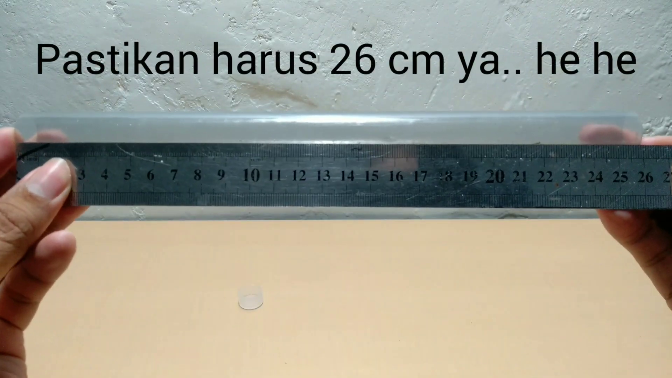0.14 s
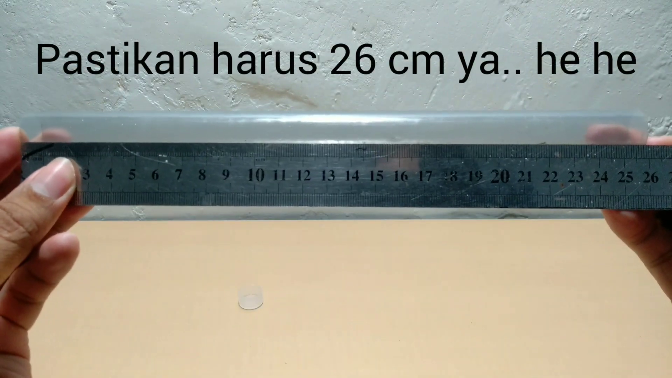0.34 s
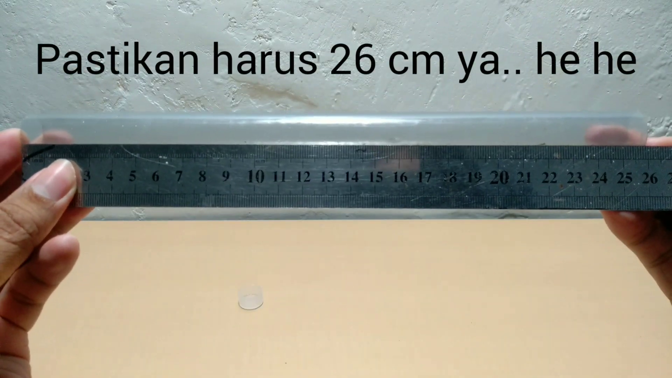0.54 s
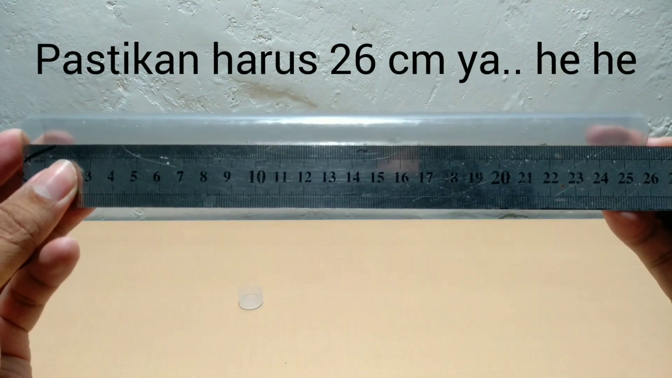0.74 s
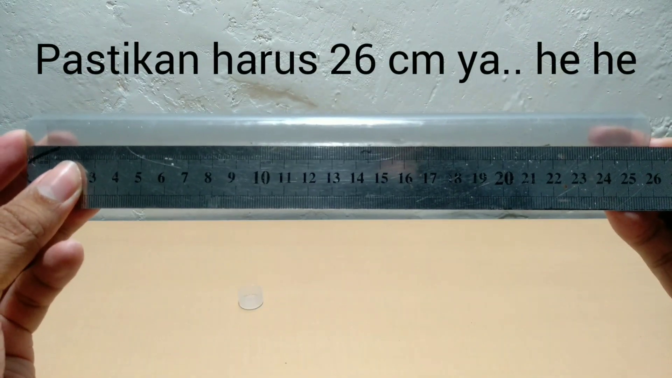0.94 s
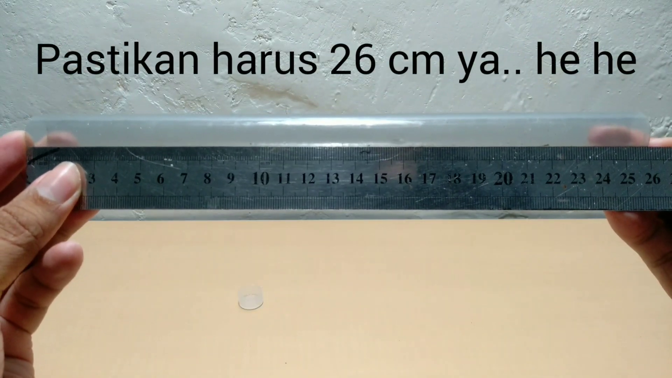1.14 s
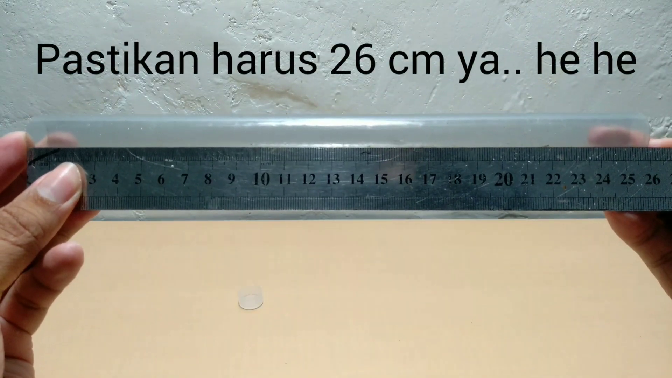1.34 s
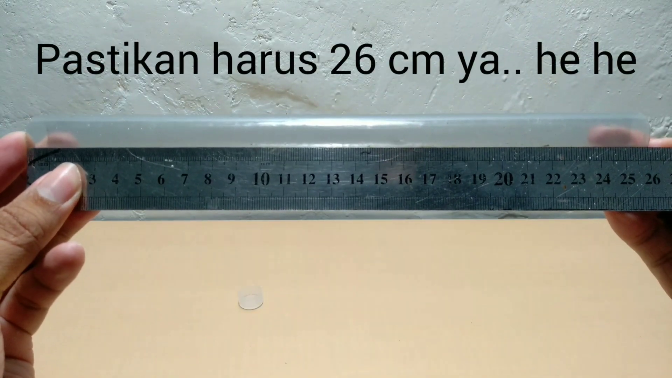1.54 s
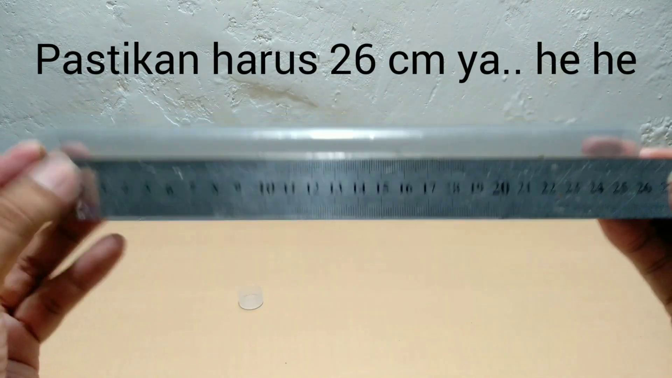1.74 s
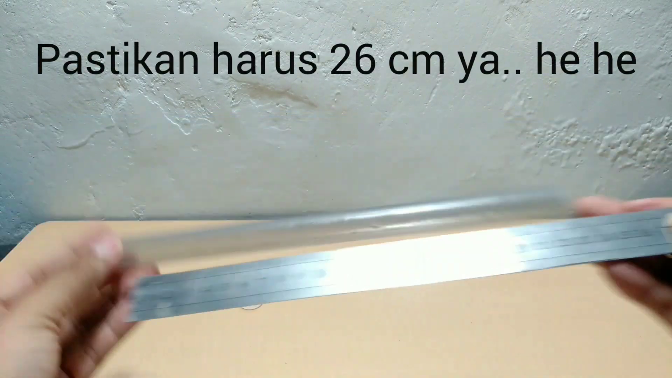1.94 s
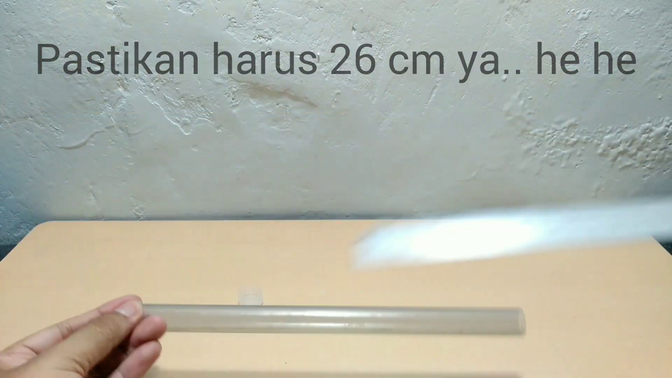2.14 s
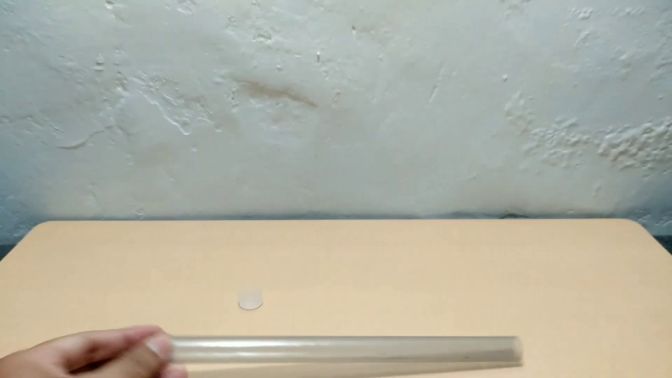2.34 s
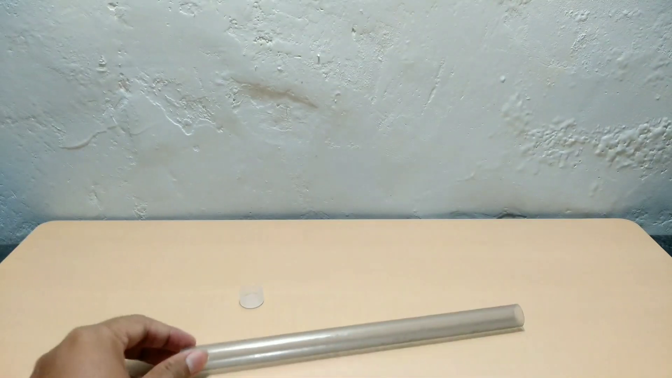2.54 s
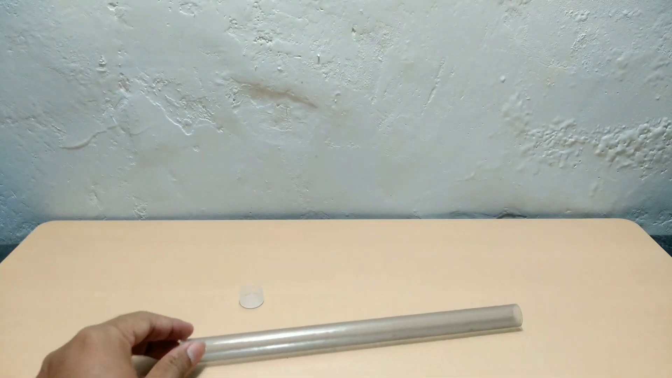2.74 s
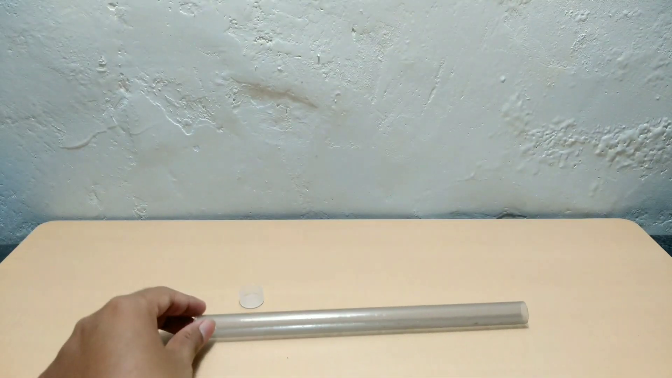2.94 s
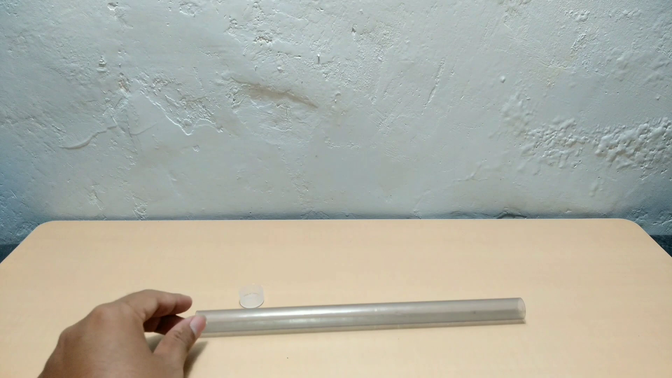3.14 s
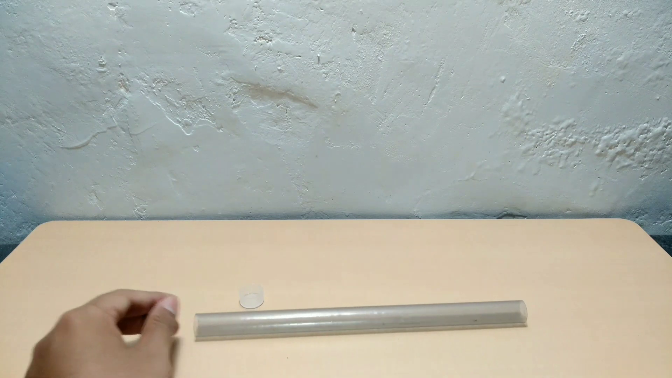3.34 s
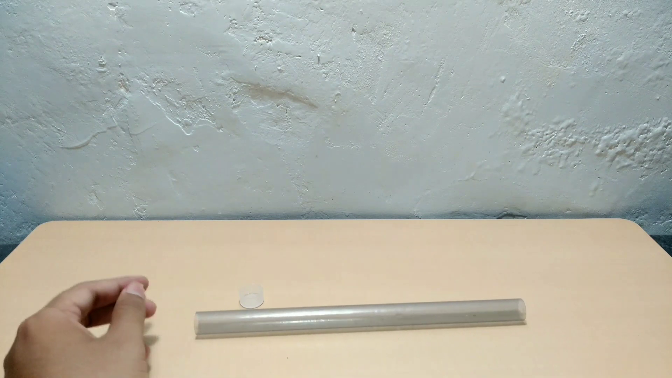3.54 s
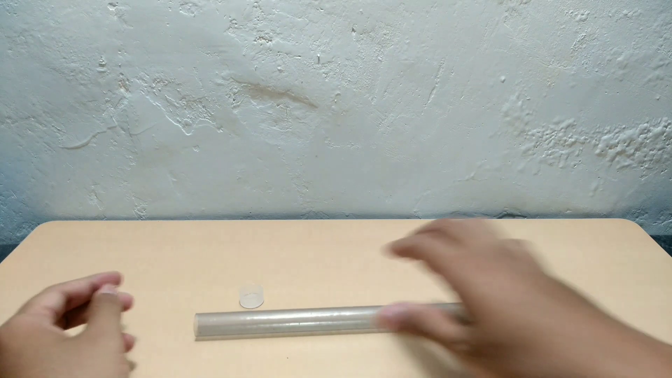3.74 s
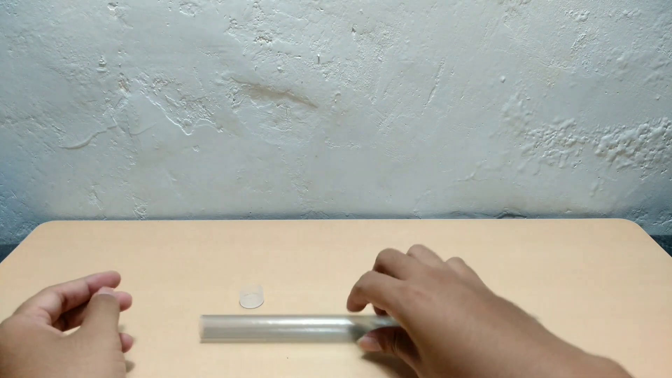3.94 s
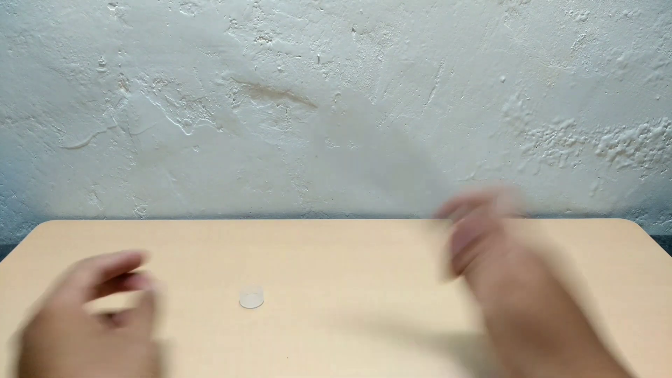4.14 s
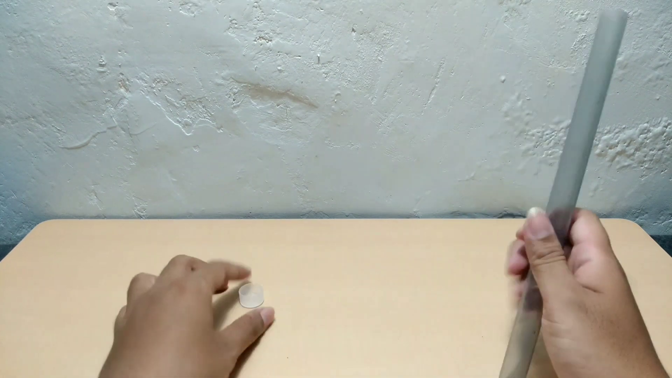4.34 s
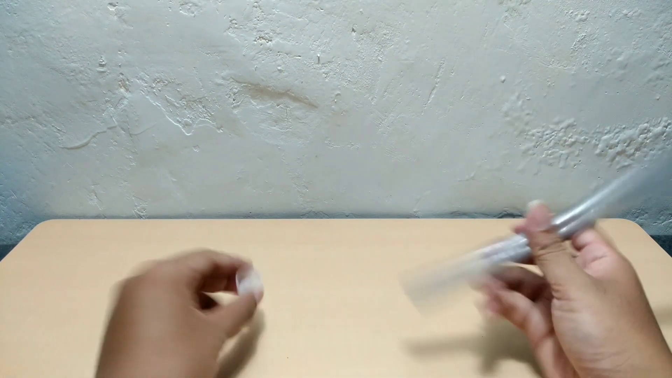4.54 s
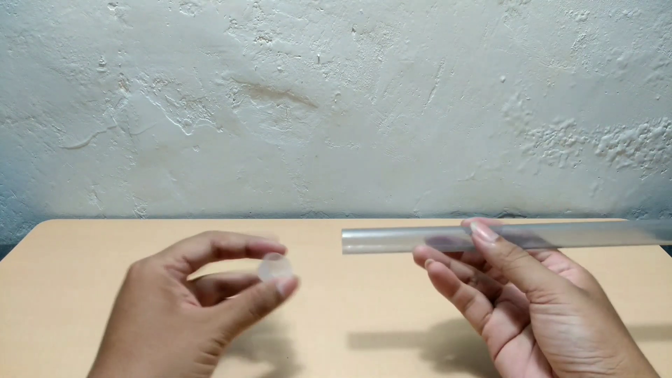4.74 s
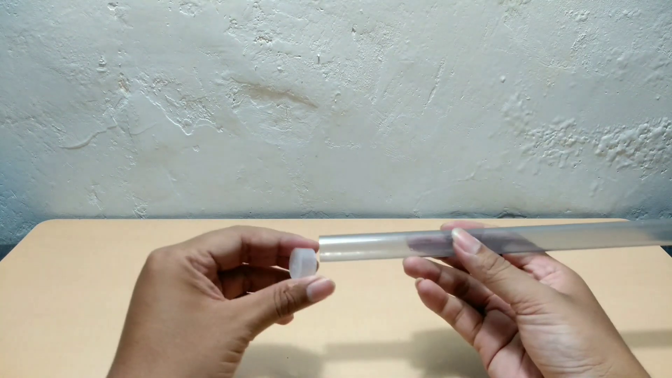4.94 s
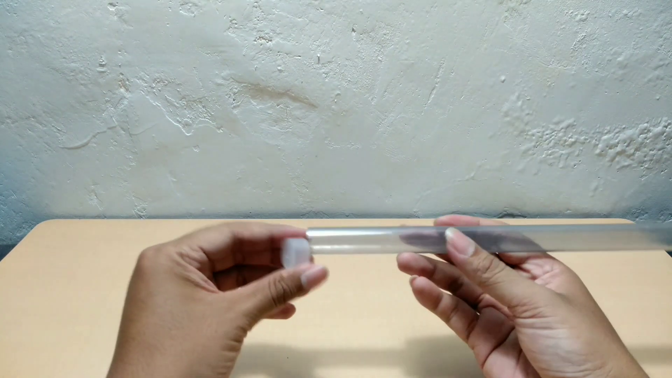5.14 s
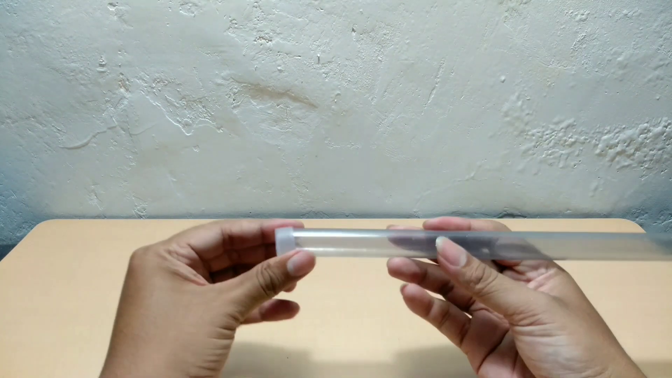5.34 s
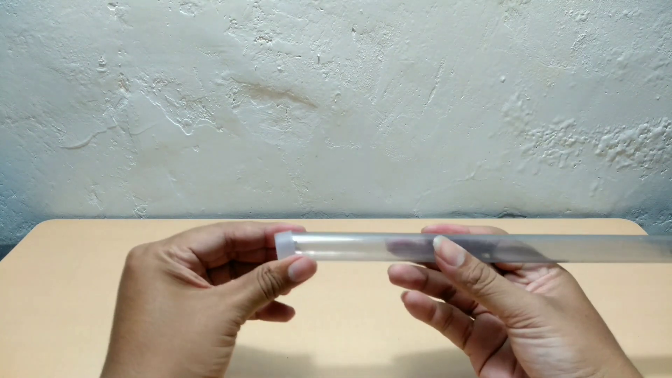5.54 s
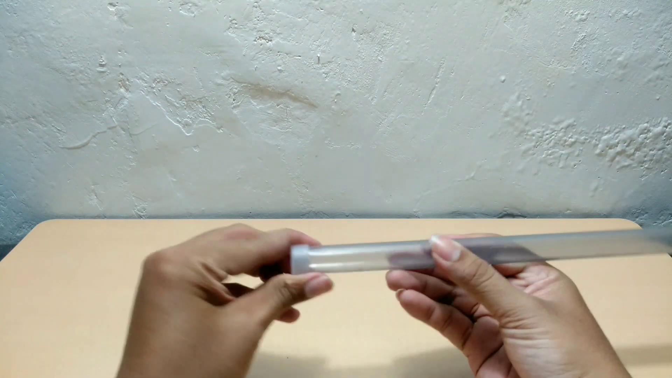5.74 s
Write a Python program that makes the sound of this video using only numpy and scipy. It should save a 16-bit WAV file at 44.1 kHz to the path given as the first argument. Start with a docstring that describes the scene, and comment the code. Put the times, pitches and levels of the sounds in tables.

```python
"""Tube and ruler over a small table

A clear plastic tube and a steel ruler are handled in a quiet room, close to a phone with two microphones.
Knocks ring modes of table and tube with a crackling contact; rubs are swelling noise with a faint squeak.
A cap slips into the tube and rings its air column; finger bumps are soft low noise; the ruler tings once.
A dull wall echo and a short noise tail place the handling in the room, over a slow rumble and faint hiss.
"""
import sys
import numpy as np
from scipy import signal
from scipy.fft import rfft, irfft, next_fast_len
from scipy.io import wavfile
from scipy.ndimage import uniform_filter1d

SR = 44100
rng = np.random.default_rng(int(sys.argv[2]) if len(sys.argv) > 2 else 0)


def log_audio(samples):
    """Write samples as a 16-bit WAV file to the path given in sys.argv[1]."""
    # one column per channel
    frames = np.atleast_2d(samples).T
    # limit to full scale, then quantise
    limited = np.clip(frames, -1, 1)
    pcm = np.round(limited * 32767).astype(np.int16)
    wavfile.write(sys.argv[1], SR, pcm)


N = 254765  # length in samples

# Knocks of tube, ruler and table top. Each row: start in seconds, level in dB, contact cut-off in Hz,
# favoured table mode in Hz, shell ring in dB, crack in dB before the shared crack trim.
KNOCK_EVENTS = [(1.9296, -19.5, 8650, 149, -1, 0), (1.9314, -25.5, 9000, 740, 3, 1),
                (2.0929, -24, 9350, 133, 3, 1), (2.1366, -29, 8900, 130, 4, 1.5),
                (2.163, -39.5, 5000, 129, -2, 2), (2.3477, -43, 2500, 1040, -10, -8),
                (2.356, -43.5, 4000, 139, -9, 2), (3.8344, -33, 6340, 124, -11, 5.5),
                (3.9276, -31.5, 3560, 1030, -5, 8), (4.063, -15.5, 1500, 1110, -1, -11),
                (4.0705, -25, 800, 520, -6, -12)]
# Clearest slides of fingers and ruler on plastic. Each row: peak time in seconds, level in dB,
# fall time constant in seconds, tilt in dB per octave.
RUB_EVENTS = [(.511, -42.5, .018, -1), (.768, -52.5, 0.011, -1.5), (.792, -50.5, 0.019, -3),
              (1.153, -55.5, .022, 3), (1.3, -53, 0.023, -1.5), (1.679, -50, 0.013, -1.5),
              (1.918, -35, .011, -1.5), (2.081, -38, .012, -.5), (2.195, -52, 0.082, -0.5),
              (2.348, -53.5, .03, 0.5), (2.97, -54, 0.038, -1.5), (3.157, -44.5, .017, .3),
              (3.57, -58, 0.024, 3), (3.78, -45.5, 0.034, 0), (3.85, -54.5, 0.032, -2.5),
              (3.915, -48.5, 0.0088, -2.5), (4.278, -40, 0.0085, 1.5), (4.305, -53, 0.034, 0),
              (4.388, -55, 0.025, 1.5), (4.48, -51.5, 0.031, -2.5), (4.712, -55, 0.025, 1),
              (5.037, -57.5, .03, 0), (5.365, -50.5, 0.044, 0.5), (5.425, -42, .012, -3),
              (5.57, -43.5, .011, 2)]
# Slips of the cap into the tube. Each row: start in seconds, level in dB, contact cut-off in Hz,
# scratch in dB, left minus right in dB.
CAP_SLIPS = [(5.4154, -31, 900, -6, 1), (5.4216, -33.5, 1490, -13, -6.5), (5.4261, -30.5, 5000, -11, 2),
             (5.5641, -29.5, 332, -13, 3), (5.571, -28.5, 510, -17, 0)]
# Soft bumps of the fingers. Each row: start in seconds, level in dB, colour centre in Hz.
FINGER_BUMPS = [(.486, -56, 800), (3.469, -52, 380), (4.228, -52.5, 279), (4.277, -40.5, 104),
                (4.323, -51, 670), (4.341, -46, 313), (4.382, -47.5, 325), (4.447, -41.5, 435),
                (4.477, -50, 795), (4.592, -48.5, 570), (4.719, -50.5, 357), (5.291, -49, 696)]

# Modes of the table top, before the favoured ones are lifted.
# Each row: frequency in Hz, level in dB, 60 dB decay in seconds.
TABLE_MODES = [(129.4, -10.5, 0.12), (171, -9, 0.057), (230, -11, 0.045), (300.5, -15, 0.099),
               (510, -11, 0.049), (543, -13, 0.052), (734, -10.5, 0.073), (802, -2, 0.025),
               (915, -7, 0.043), (1049, -15.5, 0.035), (1326, -10.5, 0.029), (1430, -18.5, 0.024),
               (1750, -6.5, 0.0073)]
# Modes of the shell of whatever strikes the table. Each row: frequency in Hz, level in dB, 60 dB decay in seconds.
SHELL_MODES = [(2540, -14, 0.05), (2760, -10, 0.022), (2970, -12, 0.029), (3280, -6.5, 0.032),
               (3775, -0.5, 0.027), (3940, -4, 0.023), (4330, -9.5, 0.021), (4850, -22, 0.038),
               (5270, -19, 0.018), (5550, -20, 0.027), (8170, -12, 0.0204), (8600, -23, .025),
               (10570, -11.5, .03)]
# Modes of the capped tube, air and wall. Each row: frequency in Hz, level in dB, 60 dB decay in seconds.
CAPPED_TUBE_MODES = [(294, -7.5, 0.03), (338, -5, 0.11), (385, -12, 0.07), (487, -7.5, 0.03),
                     (760, -15.5, 0.067), (973, -9.5, 0.1), (1635, -3.5, 0.053), (2254, -6, 0.045),
                     (2380, 0, 0.022), (2800, -15, .035)]
# Modes of the steel ruler. Each row: frequency in Hz, level in dB, 60 dB decay in seconds.
RULER_MODES = [(2260, -58, 0.28), (3628, -38, 0.085), (3660, -57, 0.16), (6000, -52, 0.065),
               (8300, -57.5, 0.5)]

# Noise colours; only their shape counts, as the noise is brought to rms 1.
# Crackling contact of a knock. Each row: frequency in Hz, relative density in dB per Hz.
CRACK_COLOUR = [(200, -15), (350, -1.5), (800, 3.5), (2000, -10.5), (3800, 3.5), (6500, -2), (9500, 7),
                (11500, 4), (13500, 1), (15500, 3.5)]
# Sliding on plastic. Each row: frequency in Hz, relative density in dB per Hz.
SLIDE_COLOUR = [(150, -53), (500, -2.5), (900, -5.5), (1700, 1.5), (3500, 3), (6500, 1), (9000, 0.5),
                (13000, -8), (15500, -9)]
# Fingers bumping tube and table. Each row: frequency in Hz, relative density in dB per Hz.
FINGER_COLOUR = [(80, 7), (200, -7.5), (310, 8), (410, 2.5), (520, -11.5), (620, 0.5), (750, 3), (900, -9),
                 (1150, -9), (2000, -9)]
# Diffuse tail of the room. Each row: frequency in Hz, relative density in dB per Hz.
TAIL_COLOUR = [(50, -7), (130, -5), (300, 0), (800, -4.5), (2000, 8), (5000, 3.5), (10000, 5.5),
               (16000, 4.5)]
# Background air. Each row: frequency in Hz, relative density in dB per Hz.
AIR_COLOUR = [(20, -28), (35, -12), (55, -2), (85, -1), (135, 1), (172, -3), (210, -12), (380, -14.5),
              (620, -23), (750, -20), (950, -23.5), (10000, -28), (13000, -33.5), (15800, -33.5)]
# Slow swell of the rumble, used relative to its median. Each row: time in seconds, level in dB.
RUMBLE_SWELL = [(0.0, -56.0), (0.47, -57.5), (0.59, -53), (1.06, -60.5), (1.18, -49.5), (1.42, -58),
                (2.36, -53), (2.48, -58.5), (3.54, -55.5), (3.77, -57.5), (4.25, -54.5), (4.95, -55.5),
                (5.19, -58.5), (5.43, -55), (5.78, -61)]
# Likeness of the two microphones. Each row: frequency in Hz, correlation from 0 to 1.
MIC_LIKENESS = [(30, .6), (70, .8), (130, .96), (300, .88), (600, .85), (1100, .62), (2200, .05),
                (15000, 0)]


def knocks(crack_t60=0.082, crack_db=-3, chatter_db=3.5, chatter_s=0.00129, bite_s=0.0005,
           build_s=0.00041, push_s=0.00012, ripple_db=3, edge_db=-11,
           favour_db=8, favour_octaves=0.28, pan_db=-1):
    """Each blow rings the table top and the thing that strikes it, and chatters at the contact."""
    out, t = np.zeros((2, N)), event_time(size=6144)
    table_hz, table_db, table_t60 = np.transpose(TABLE_MODES)
    for s, db, cut_hz, favoured_hz, shell_db, tick_db in KNOCK_EVENTS:
        chatter = undb(tick_db + crack_db + chatter_db * wander(t / chatter_s)) * onset(t, bite_s)
        crack = noise(len(t), CRACK_COLOUR, ripple_db * ripple(len(t))) * fade(t, crack_t60) * chatter
        shell = ring(SHELL_MODES, t) * undb(shell_db) * onset(t, build_s)
        # the place of the blow decides which modes of the table answer most
        struck_db = table_db + favour_db * hump(table_hz, favoured_hz, favour_octaves)
        table = ring(zip(table_hz, struck_db, table_t60), t) * onset(t, push_s)
        blow = soften(table + shell + crack, cut_hz)
        # a hard edge lets a little treble through even on a soft blow
        edge = undb(edge_db) * crack
        add(out, s, -undb(db) * (blow + edge), pan_db)
    return out


def rubs(slides, rise_share=0.9, slip_db=-0.5, slip_s=0.0057,
         grain_db=1.5, grain_s=0.0012, catch_db=1.5, catch_s=0.00709, ripple_db=4.0,
         squeak_hz=8600, squeak_db=3, squeak_octaves=0.38,
         hollow_hz=775, hollow_db=10.5, hollow_octaves=0.16):
    """Slides swell and die away; skin catches and lets go, plastic adds grain, and the tube answers hollowly."""
    out, t = np.zeros((2, N)), event_time()
    lead = 0.15  # seconds of swell kept ahead of the peak
    hz = bins(len(t))
    squeak = squeak_db * hump(hz, squeak_hz, squeak_octaves)
    hollow = hollow_db * hump(hz, hollow_hz, hollow_octaves)
    for s, db, fall, tilt_db in slides:
        # the rise takes rise_share of the fall time
        swell = np.exp(np.minimum((t - lead) / rise_share, lead - t) / fall)
        # at the peak the skin lets go with a short extra burst
        slip = undb(slip_db) * (t > lead) * np.exp(-np.abs(t - lead) / slip_s)
        rough_db = grain_db * wander(t / grain_s) + catch_db * wander(t / catch_s)
        colour_db = tilt_db * np.log2(hz + 1) + squeak + hollow + ripple_db * ripple(len(t))
        hiss = noise(len(t), SLIDE_COLOUR, colour_db)
        add(out, s - lead, undb(db + rough_db) * (swell + slip) * hiss)
    return out


def grip_shifts(per_s=3.4, level_db=-60.5, spread_db=2, fall_s=0.025, tilt_db=0):
    """Faint slides as the grip shifts, one at a chance moment in each equal slot, as rows like RUB_EVENTS."""
    starts = np.arange(0, N / SR - 1 / per_s, 1 / per_s)
    chance = rng.uniform(0, 1, (len(starts), 2))
    return [(s + late / per_s, level_db + spread_db * (2 * strong - 1), fall_s, tilt_db)
            for s, (late, strong) in zip(starts, chance)]


def cap(scratch_t60=0.018):
    """Each slip scratches and rings the stopped air column (near odd multiples of 330 Hz) and the tube wall."""
    out, t = np.zeros((2, N)), event_time(size=6144)
    for s, db, cut_hz, scratch_db, pan_db in CAP_SLIPS:
        scratch = undb(scratch_db) * noise(len(t), SLIDE_COLOUR) * fade(t, scratch_t60)
        pop = soften(ring(CAPPED_TUBE_MODES, t), cut_hz)
        add(out, s, undb(db) * (pop + scratch), pan_db)
    return out


def bumps(rise_s=0.0017, fall_s=0.033, skirt_db=7):
    """Flesh lands slowly and shudders, stirring mostly the low resonances of tube and table."""
    out, t = np.zeros((2, N)), event_time(size=8192)
    shape = onset(t, rise_s) * np.exp(-t / fall_s)
    shape = shape / shape.max()
    for s, db, centre_hz in FINGER_BUMPS:
        octaves = np.log2((bins(len(t)) + 1) / centre_hz)
        thud = noise(len(t), FINGER_COLOUR, -skirt_db * octaves ** 2)
        add(out, s, undb(db) * shape * thud)
    return out


def ruler(s=3.016, pan_db=5, touch_s=0.0021):
    """The steel ruler is touched lightly, so its modes build gently, and it tings."""
    out, t = np.zeros((2, N)), event_time()
    add(out, s, ring(RULER_MODES, t) * onset(t, touch_s), pan_db)
    return out


def room(x, wet_db=-10.0, low_t60=0.19, high_t60=0.14, split_hz=1760, first_s=0.0047,
         wall_s=0.00378, wall_db=-7, wall_hz=2500):
    """The wall behind the table throws back one dull echo; the small room adds a short diffuse tail."""
    t = event_time()
    tail = noise(len(t), TAIL_COLOUR)
    low = soften(tail, split_hz)
    tail = low * fade(t, low_t60) + (tail - low) * fade(t, high_t60)
    tail *= np.clip(t / first_s - 1, 0, 1)  # silent until first_s, full at twice that
    tail *= undb(wet_db) / np.sqrt(np.sum(tail ** 2) / 2)
    out = x + signal.fftconvolve(x, tail, axes=1)[:, :N]
    add(out, wall_s, undb(wall_db) * soften(x, wall_hz))
    return out


def background(air_db=-55, split_hz=260, rumble_db=-1, throb_db=3.5, throb_hz=16,
               hiss_db=-3, waver_db=1, waver_hz=9, flicker_db=4.5):
    """A low rumble that swells slowly and throbs unevenly under a faint, flickering hiss."""
    t = np.arange(N) / SR
    # level of the whole air, before rumble and hiss are trimmed apart
    air = noise(next_fast_len(N), AIR_COLOUR)[:, :N] * undb(air_db)
    low = signal.sosfiltfilt(signal.butter(2, split_hz, fs=SR, output="sos"), air)
    s, db = np.transpose(RUMBLE_SWELL)
    swell_db = np.interp(t, s, db - np.median(db)) + throb_db * wander(t * throb_hz)
    rumble = low * undb(rumble_db + swell_db)
    hiss = flicker(air - low, flicker_db) * undb(hiss_db + waver_db * wander(t * waver_hz))
    return rumble + hiss


def undb(db):
    """Decibels to gain."""
    return 10 ** (np.asarray(db) / 20)


def on_log(points, hz):
    """Read (Hz, value) points on a log-frequency axis."""
    f, v = np.transpose(points)
    return np.interp(np.log(hz + 1), np.log(f), v)


def bins(size):
    """Frequencies in Hz of a spectrum of this many samples."""
    return np.fft.rfftfreq(size, 1 / SR)


def event_time(size=16384):
    """Time axis in seconds of one short event."""
    return np.arange(size) / SR


def noise(size, colour, extra_db=0):
    """Coloured stereo noise of rms 1; alike in most of the bass, unrelated in the high treble."""
    hz = bins(size)
    alike = np.clip(on_log(MIC_LIKENESS, hz), -.99, .99)
    mid, side = rfft(rng.standard_normal((2, size)))
    both = mid * np.sqrt(1 + alike) + side * np.sqrt(1 - alike) * np.array([[1], [-1]])
    x = irfft(both * undb(on_log(colour, hz) + extra_db), size)
    return x / x.std()


def fade(t, t60):
    """A decay of 60 dB in t60 seconds."""
    return np.exp(-np.log(1000) * t / t60)


def onset(t, rise_s):
    """A rise from 0 towards 1 with a time constant in seconds."""
    return 1 - np.exp(-t / rise_s)


def ring(modes, t):
    """Struck modes, slightly detuned by chance; the higher ones reach the two microphones out of step."""
    out = 0
    for k, (hz, db, t60) in enumerate(modes):
        # the phase between the microphones follows their likeness at this frequency
        apart = np.arccos(np.clip(on_log(MIC_LIKENESS, hz), -1, 1))
        skew = (-1) ** k * apart / 2 * np.array([[1], [-1]])
        detune = 1 + 0.0041 * rng.standard_normal()
        start = rng.uniform(0, 2 * np.pi) * min(hz / 3000, 1)
        tone = np.cos(2 * np.pi * hz * detune * t + skew + start)
        out = out + undb(db) * fade(t, t60) * tone
    return out


def soften(x, cut_hz):
    """A low-pass: a softer contact pushes for longer and leaves out the treble."""
    return signal.sosfilt(signal.butter(2, min(cut_hz, SR / 2.2), fs=SR, output="sos"), x)


def add(out, s, x, pan_db=0):
    """Mix a sound in at s seconds; pan_db is left minus right."""
    i = max(int(s * SR), 0)
    panned = x * undb(np.array([[pan_db], [-pan_db]]) / 2)
    out[:, i:i + x.shape[1]] += panned[:, :N - i]


def wander(points):
    """Random levels joined by straight lines, read at the given positions."""
    levels = rng.standard_normal(int(points.max()) + 2)
    return np.interp(points, np.arange(len(levels)), levels)


def ripple(size, spacing_hz=220):
    """Chance spectral peaks and dips, full above 2 kHz: every contact point favours its own resonances."""
    hz = bins(size)
    return wander(hz / spacing_hz) * np.clip(hz / 2000, 0, 1)


def hump(hz, centre_hz, octaves):
    """A bell of height 1 on a log-frequency axis."""
    return np.exp(-(np.log2((hz + 1) / centre_hz) / octaves) ** 2)


def flicker(x, depth_db, size=2048):
    """Let narrow bands waver, with neighbouring bands and frames smoothed together."""
    _, _, bands = signal.stft(x, nperseg=size)
    walk = rng.standard_normal(bands.shape[1:])
    walk = uniform_filter1d(walk, size=7, axis=0)
    walk = uniform_filter1d(walk, size=2, axis=1)
    gain = undb(depth_db * walk / walk.std())
    return signal.istft(bands * gain, nperseg=size)[1][:, :N]


def scene():
    """All handling sounds in the room, over its background."""
    slides = rubs(RUB_EVENTS + grip_shifts())
    handling = knocks() + slides + cap() + bumps() + ruler()
    return room(handling) + background()


def record(dry, bass_hz=55, top_hz=15800):
    """The phone thins the deep bass and cuts the top steeply."""
    thin = signal.sosfilt(signal.butter(2, bass_hz, "high", fs=SR, output="sos"), dry)
    return signal.sosfilt(signal.ellip(12, .2, 80, top_hz, fs=SR, output="sos"), thin)


dry = scene()
out = record(dry)
log_audio(out)
```